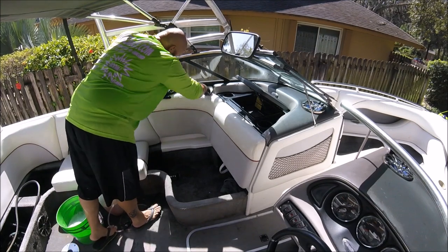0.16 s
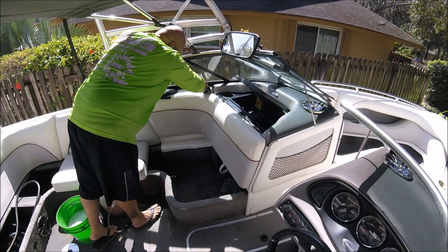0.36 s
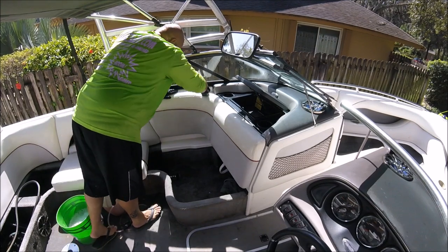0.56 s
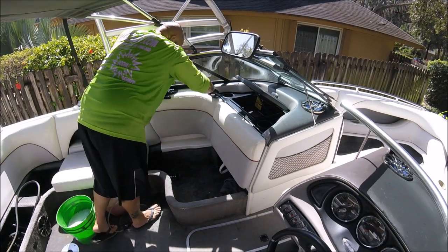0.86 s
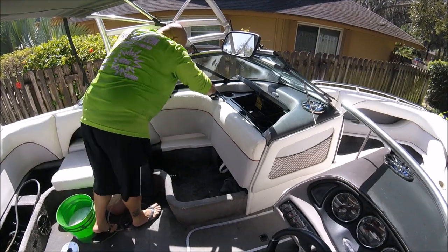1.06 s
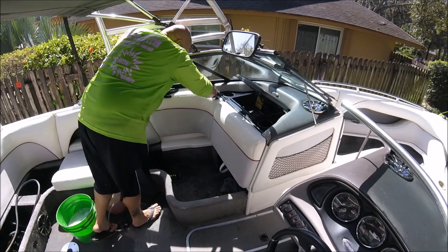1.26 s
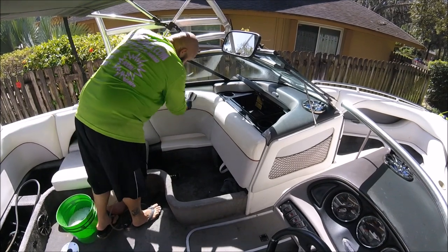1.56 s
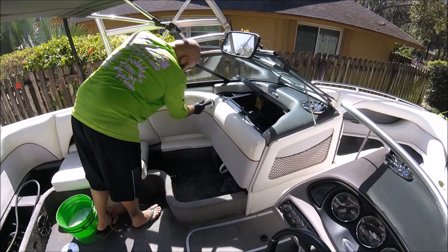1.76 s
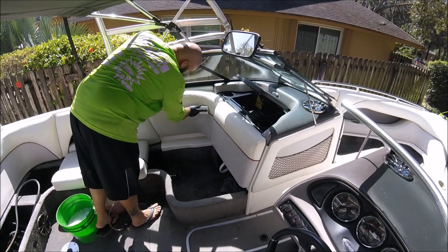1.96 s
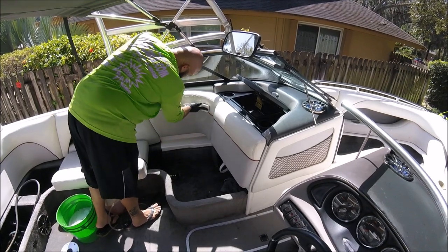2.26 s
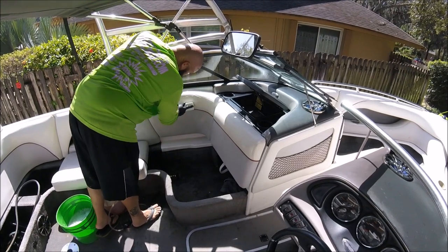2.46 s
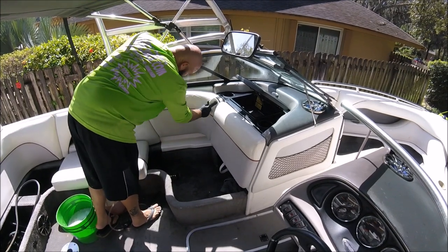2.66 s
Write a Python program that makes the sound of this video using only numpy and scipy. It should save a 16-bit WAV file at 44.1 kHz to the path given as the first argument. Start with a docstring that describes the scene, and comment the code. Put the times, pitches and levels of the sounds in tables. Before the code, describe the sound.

A stiff brush scrubs wet vinyl back and forth, softly at first among hollow hull knocks, then louder and steadier; light wind rumble and faint hiss outdoors, caught by a small microphone with a ringing treble.

```python
"""In a boat, outdoors in a light wind, a stiff brush scrubs wet vinyl with quick back-and-forth strokes.
The scrub is a crowd of tiny random flicks that grows louder and brighter towards mid-stroke.
Wind and air are coloured noise. Now and then the handle knocks the hollow hull: decaying sines set off
by a blow and its bounces, with short echoes. The microphone's small housing rings in the treble."""
import sys
import numpy as np
from scipy import signal
from scipy.io import wavfile
from scipy.ndimage import uniform_filter1d

SR = 44100
rng = np.random.default_rng(int(sys.argv[2]) if len(sys.argv) > 2 else 0)


def gain_from_db(level_db):
    """Turn a decibel level (scalar or array-like) into a linear amplitude factor."""
    decades = np.asarray(level_db, float) / 20
    return 10 ** decades


def unload_wav(signal):
    """Save mono or channel-first audio to the path in sys.argv[1] as 16-bit WAV at rate SR, clipped to [-1, 1]."""
    wavfile.write(
        sys.argv[1],
        SR,
        np.round(np.clip(np.atleast_2d(signal).T, -1, 1) * 32767).astype(np.int16),
    )


N = 123479  # length [samples]


def evened(x):
    """Scales to an rms (average strength) of 1."""
    return x / np.sqrt(np.mean(x ** 2) + 1e-20)


def read(points, hz):
    """Reads a table between its points, on a log-frequency axis."""
    f, value = np.transpose(points)
    return np.interp(np.log(hz + 1), np.log(f + 1), value)


def add(mix, s, sound):
    """Mixes a sound in at time s."""
    part = mix[round(s * SR):][:len(sound)]
    part += sound[:len(part)]


def drift(shape, size):
    """Smooth chance of rms 1 over a field of frequency bins x time frames."""
    field = rng.standard_normal(shape)
    field = uniform_filter1d(field, size[0], axis=0)
    return evened(uniform_filter1d(field, size[1], axis=1))


def shaped(x, gain, size):
    """Colours x over time: multiplies its short-time spectrum by gain(Hz, s)."""
    overlap = size * 3 // 4
    hz, t, z = signal.stft(x, SR, nperseg=size, noverlap=overlap)
    z = z * gain(hz[:, None], t)
    return signal.istft(z, SR, nperseg=size, noverlap=overlap)[1][:N]


FLICKS_PER_S, FLICK_SPREAD_DB = 14000, 1.8
SNAG_DB, PATCH_DB = .9, 2.2  # rms of chance: over the whole scrub at once, and over patches of it
POINTED = 0.51  # share of a straight rise and fall in the otherwise round arch of speed
DRAG_HZ, TREBLE_HZ = 1990, 5400  # a stroke's drag acts below the first, its treble above the second
# the scrub's low edge, with a slight narrow dip at it, climbs with speed
EDGE_SLOW_HZ, EDGE_FAST_HZ, EDGE_DB, EDGE_OCTAVES = 760, 2560, -1, 0.067
# brush strokes: (start [s], speeding up [s], slowing down [s], level [dB], treble [dB], low drag [dB])
STROKES = [(-.04, 0.04, 0.045, -35.5, 3.5, 4.5), (0.065, 0.027, 0.059, -39.5, 0, 5),
           (0.184, 0.072, 0.056, -36, 0.5, 7.5), (.30, 0.046, 0.056, -48.5, -2, 20),
           (.41, 0.067, 0.071, -44.5, -7, 9.5), (0.562, .1, 0.041, -48.5, 3.5, 12.5),
           (0.728, 0.05, 0.076, -45.5, -3, 14.5), (0.902, 0.092, 0.1, -36.5, -1, 11),
           (1.11, 0.075, 0.034, -42, -3.5, 2), (1.167, 0.079, 0.03, -37.5, -1.5, 9.5),
           (1.326, 0.054, 0.1, -36.5, -10, 2.5), (1.542, 0.092, 0.067, -30, 0, -4.5),
           (1.714, 0.09, 0.056, -29, 0.5, 0.5), (1.856, 0.072, 0.089, -28, -2.5, -5.5),
           (2.014, 0.063, 0.062, -31, 2.5, 2), (2.138, 0.056, 0.11, -33, -6.5, 2.5),
           (2.298, 0.068, 0.073, -31, -3.5, -1), (2.438, 0.034, 0.12, -30, -5, -1.5),
           (2.694, 0.042, 0.068, -45.5, 1.5, 13)]
# colour of the bristles at full speed: (frequency [Hz], relative level [dB])
BRISTLE_COLOUR = [(600, -6), (850, -8), (1500, -5), (2500, -3.5), (4000, -5.5), (5500, -6), (7500, -15.5),
                  (10000, -23.5), (13000, -22), (15000, -80)]
# how steeply loudness follows speed: (frequency [Hz], power of speed [no unit])
SPEED_POWER = [(700, 0.66), (1500, 0.73), (3000, 1.34), (5000, 1.8), (9000, 1.13), (13000, 2)]


def brush():
    """Dense bristle flicks; every band swells with the speed of the stroke, most steeply in the treble."""
    happens = rng.random(N) < FLICKS_PER_S / SR
    strength_db = FLICK_SPREAD_DB * np.minimum(rng.exponential(1, N), 4)
    flicks = happens * rng.standard_normal(N) * gain_from_db(strength_db)

    def gain(hz, t):
        """Adds up the power of all strokes over frequency and time, then colours it."""
        low = 1 / (1 + (hz / DRAG_HZ) ** 4)
        high = 1 / (1 + (TREBLE_HZ / (hz + 1)) ** 4)
        steepness = np.abs(read(SPEED_POWER, hz))
        power = np.zeros((len(hz), len(t)))
        for start, up, down, db, treble_db, drag_db in STROKES:
            # u runs from 0 to 1 along the stroke and is 0.5 at full speed
            u = np.interp(t, [start, start + up, start + up + down], [0, .5, 1])
            round_arch = np.sin(np.pi * u)
            straight_arch = 1 - np.abs(2 * u - 1)
            speed = np.abs((1 - POINTED) * round_arch + POINTED * straight_arch) * (u < 1)
            edge_hz = EDGE_SLOW_HZ + (EDGE_FAST_HZ - EDGE_SLOW_HZ) * speed ** 2
            octaves = np.log2((hz + 1) / edge_hz)
            dip_db = EDGE_DB * np.exp(-.5 * (octaves / EDGE_OCTAVES) ** 2)
            edge_db = dip_db + 6 * np.minimum(octaves, 0)  # falls 6 dB per octave below the edge
            level = gain_from_db(db + edge_db + treble_db * high + drag_db * low)
            power += (level * speed ** steepness) ** 2
        colour = gain_from_db(read(BRISTLE_COLOUR, hz))
        snags = SNAG_DB * drift((1, len(t)), size=(1, 5))
        patches = PATCH_DB * drift(power.shape, size=(3, 16))
        return np.sqrt(power) * evened(colour) * gain_from_db(snags + patches)

    return shaped(evened(flicks), gain, size=256)


WIND_LUMP_DB = 3.2  # rms of the lumps
# loudness of the wind: (time [s], level [dB])
WIND_LEVEL = [(0.0, -44.5), (0.34, -41.5), (1.32, -41), (2.8, -48)]
# colour of the wind: (frequency [Hz], relative level [dB])
WIND_COLOUR = [(15, -29), (30, 9.5), (80, 3.5), (130, -8.5), (165, 2.5), (230, -13), (500, -39.5)]
# wind bumping the microphone: (time [s], level before its swell [dB], frequency [Hz])
PUFFS = [(0.191, -33, 83), (0.355, -25, 87), (1.72, -35.5, 90), (1.825, -37, 91.5), (1.989, -29, 83.5),
         (2.047, -28, 98), (2.152, -29.5, 89.5), (2.171, -23, 83)]


def wind():
    """Lumpy low rumble of coloured noise, with bumps that each last most of one sine cycle."""
    def lumps(hz, t):
        """Wind colour with random lumps over frequency and time."""
        return gain_from_db(read(WIND_COLOUR, hz) + WIND_LUMP_DB * drift((len(hz), len(t)), size=(4, 4)))

    t, db = np.transpose(WIND_LEVEL)
    rumble = evened(shaped(rng.standard_normal(N), lumps, size=2048))
    out = rumble * gain_from_db(np.interp(np.arange(N) / SR, t, db))
    for s, level_db, hz in PUFFS:
        cycles = np.arange(0, 0.83 / hz, 1 / SR) * hz
        swell = np.exp(-((cycles - .45) / 0.38) ** 2)
        add(out, s, gain_from_db(level_db) * np.sin(2 * np.pi * cycles) * swell)
    return out


AIR_DB, AIR_PATCH_DB = -50, 2.2  # rms level of the hiss, and rms of its patches
# colour of the outdoor hiss: (frequency [Hz], relative level [dB])
AIR_COLOUR = [(150, -2.5), (280, 2.5), (500, 6.5), (650, -14), (900, -2), (2000, -1.5), (4000, -5.5),
              (6500, -5.5), (9600, -18.5), (13000, -64)]


def air():
    """Distant outdoor hiss: coloured noise with faint patches."""
    def patches(hz, t):
        """Hiss colour with random patches over frequency and time."""
        return gain_from_db(read(AIR_COLOUR, hz) + AIR_PATCH_DB * drift((len(hz), len(t)), size=(10, 10)))

    return gain_from_db(AIR_DB) * evened(shaped(rng.standard_normal(N), patches, size=1024))


def ring(modes, t, weight):
    """Decaying sines, one per way the body can vibrate, scaled to a peak of 1."""
    out = np.zeros(len(t))
    for (hz, db, t60), w in zip(modes, weight):
        out += w * gain_from_db(db - 60 * t / t60) * np.sin(2 * np.pi * hz * t)
    return out / np.abs(out).max()


BOUNCES_PER_S, GRIT_DB = 3500, -16  # bounces also scratch
RISE_CYCLES = 0.35  # a blow one octave broad rises in about this many cycles, a narrower one in more
SPOT_DETUNE = .012  # largest shift of a hull pitch from knock to knock, as a share of it
DAMPED_DB, DAMPING_S = -20.5, .0018  # the hand settles on the panel and damps it
BOOM_RISE_S, BOOM_SHAKE_S = 0.0082, 0.015
# ways the hull vibrates: (frequency [Hz], level [dB], time to fall by 60 dB [s])
HULL = [(285, -8, .04), (343, 0, .12), (425, 0, .055), (506, -2, .045), (619, -6, .06), (715, -8, .04),
        (870, -10, .035), (950, -3, .03), (1090, -3, .028), (1235, -5, .028), (1600, -8, .025),
        (2060, -9, .02), (2330, -6, .02), (3050, -7, .016)]
# deep panels of the hull: (frequency [Hz], level [dB], time to fall by 60 dB [s])
DEEP_PANELS = [(61, -13, 0.18), (103, -9.5, 0.05), (170.6, -1, 0.053), (212, -13.5, 0.11)]


def knock(start, db, bright_hz, octaves, rattle_s, free_s, boom_db, chance):
    """A blow and its dying bounces ring the hull near the brightest pitch; deep panels shudder after."""
    t = np.arange(0, .4, 1 / SR)
    ts = t[:chance.shape[1]]
    sign = 2 * chance[1] - 1  # random between -1 and 1

    blows = (chance[0] < BOUNCES_PER_S / SR) * sign * np.exp(-ts / rattle_s)
    blows[0] = -2  # the first, hardest hit
    distance = np.log2(np.array(HULL)[:, 0] / bright_hz) / octaves
    weight = 1 / (1 + distance ** 2) ** 2
    spot = [(hz * (1 + SPOT_DETUNE * v), mode_db, t60) for (hz, mode_db, t60), v in zip(HULL, sign[::-1])]
    body = signal.fftconvolve(ring(spot, t, weight), blows)[:len(t)]
    body = body * (1 - np.exp(-(t * bright_hz * np.sqrt(octaves) / RISE_CYCLES) ** 2))
    damping = (1 + np.tanh((t - free_s) / DAMPING_S)) / 2  # 0 while free, 1 when damped
    body = body / np.abs(body).max() * gain_from_db(DAMPED_DB * damping)

    band = [bright_hz / 2, bright_hz * 2 ** octaves]
    bounces = np.pad(blows[1:], (1, len(t) - len(ts)))
    grit = signal.sosfilt(signal.butter(2, band, "band", fs=SR, output="sos"), bounces)
    body = body + gain_from_db(GRIT_DB) * grit

    shake = sign * (1 - np.exp(-ts / BOOM_RISE_S)) * np.exp(-ts / BOOM_SHAKE_S)
    boom = signal.fftconvolve(ring(DEEP_PANELS, t, np.ones(len(DEEP_PANELS))), shake)[:len(t)]
    return start, gain_from_db(db) * body + gain_from_db(boom_db) * boom / np.abs(boom).max()


# knocks of the handle: (time [s], level [dB], brightest pitch [Hz], breadth [octaves],
# rattle [s], rings freely for [s], boom [dB])
KNOCKS = [(0.2815, -9.5, 359, 0.44, 0.001, 0.02, -20.5), (0.4751, -15.5, 1140, 0.46, 0.0029, 0.024, -33),
          (0.4764, -5.5, 381, 0.64, 0.00043, 0.014, -15.5), (.797, -17, 383, 0.17, 0.00076, 0.0093, -25.5),
          (0.8227, -5.5, 990, 1.3, 0.01, 0.022, -18.5), (0.914, -18.5, 1670, 2.56, 0.026, 0.024, -33.5),
          (1.026, -23, 940, 0.39, 0.008, 0.014, -18.5), (1.039, -19, 690, 0.36, 0.0073, 0.011, -22.5),
          (1.061, -12, 595, 0.3, 0.0067, 0.024, -20), (1.0677, -7.5, 435, 0.26, 0.00049, 0.012, -16),
          (1.26, -15.5, 338, 0.29, 0.002, 0.014, -19.5)]


def hull_knocks():
    """All knocks in turn; a high-pass at 45 Hz removes the slow offset that the summed blows leave."""
    out = np.zeros(N)
    for row, chance in zip(KNOCKS, rng.random((len(KNOCKS), 2, 6000))):
        add(out, *knock(*row, chance))
    return signal.sosfilt(signal.butter(2, 45, "high", fs=SR, output="sos"), out)


COCKPIT_DB = -17.5
# echoes among the seats: (frequency [Hz], time to fall by 60 dB [s])
COCKPIT = [(200, 0.23), (500, 0.13), (1000, 0.23), (2000, 0.049)]


def cockpit(x):
    """Echoes as a dense tail of noise in which each band dies at its own speed."""
    def fade(hz, t):
        """Level left in each band after t seconds."""
        return gain_from_db(-60 * t / read(COCKPIT, hz))

    tail = shaped(rng.standard_normal(SR // 2), fade, size=256)
    tail[:150] = 0  # samples before the first echo
    return gain_from_db(COCKPIT_DB) * signal.fftconvolve(x, tail / np.linalg.norm(tail))[:N]


def scene():
    """Brush, wind, air, and knocks with their echoes."""
    knocks = hull_knocks()
    return (brush() + wind() + air() + knocks + cockpit(knocks))[None]


# ringing of the microphone's housing: (frequency [Hz], width [Hz], level [dB])
HOUSING = [(3017, 670, 0.5), (3833, 248, 3.5), (6426, 212, 8.5), (11180, 240, -0.5)]


def housing(dry):
    """The small housing around the microphone adds narrow resonances to the direct sound."""
    rung = dry.copy()
    for hz, width_hz, db in HOUSING:
        rung += gain_from_db(db) * signal.lfilter(*signal.iirpeak(hz, hz / width_hz, SR), dry)
    return rung


def roll_off(x):
    """The treble ends steeply here."""
    return signal.sosfilt(signal.butter(12, 14130, fs=SR, output="sos"), x)


def record(dry):
    """The housing rings, then the top rolls off."""
    rung = housing(dry)
    mix = signal.sosfilt(signal.butter(8, 11850, fs=SR, output="sos"), rung)  # low-pass [Hz]
    return roll_off(mix)


dry = scene()
out = record(dry)
unload_wav(out)
```